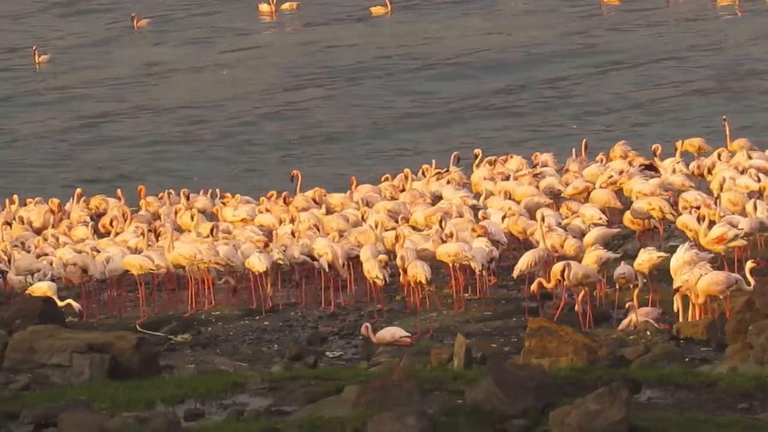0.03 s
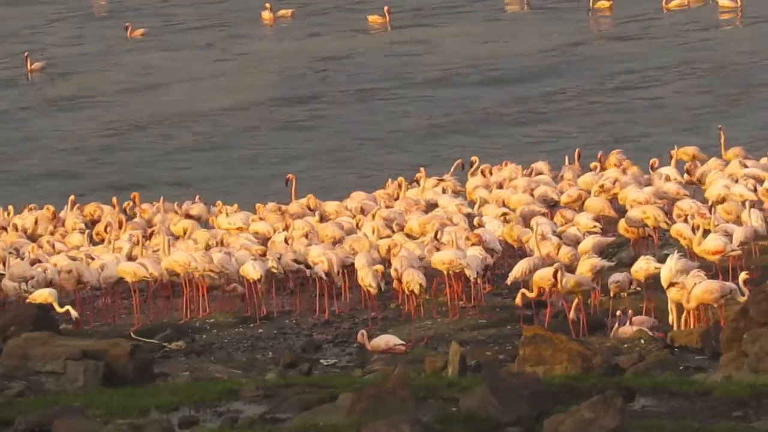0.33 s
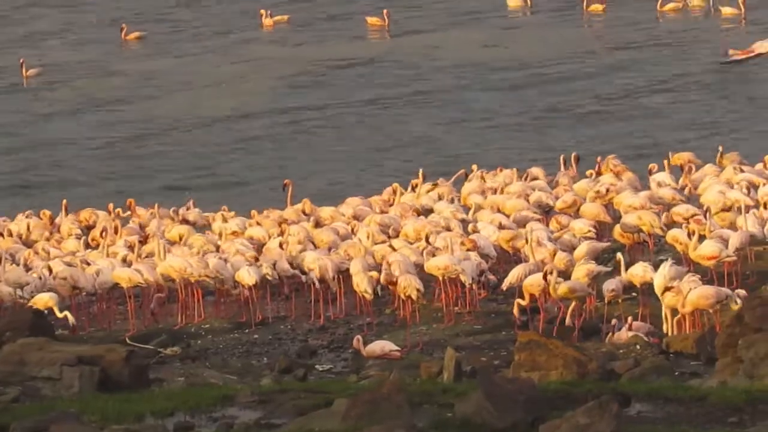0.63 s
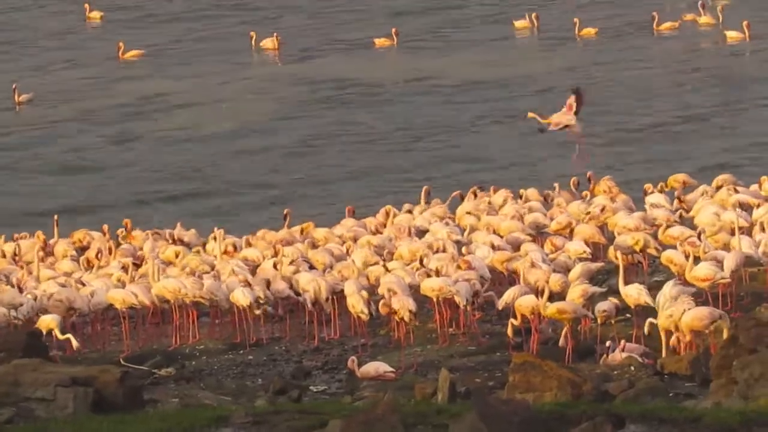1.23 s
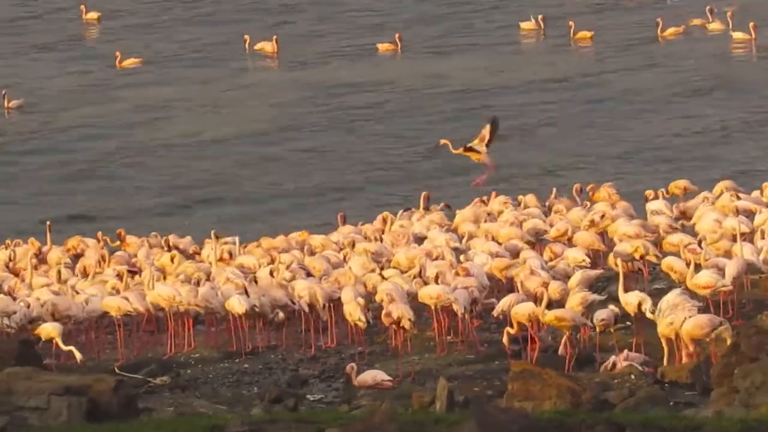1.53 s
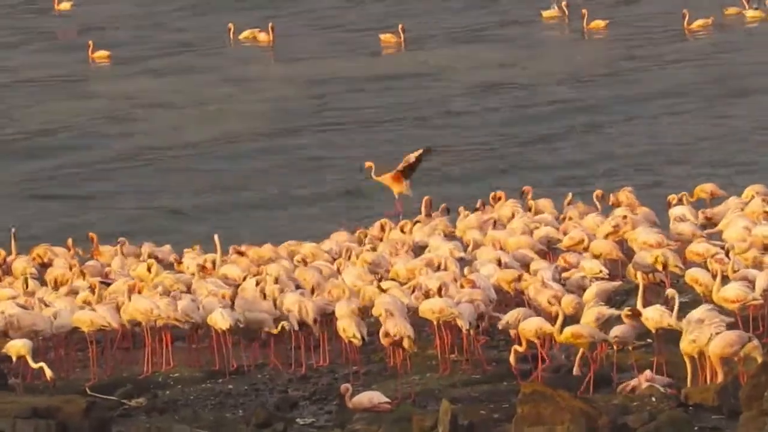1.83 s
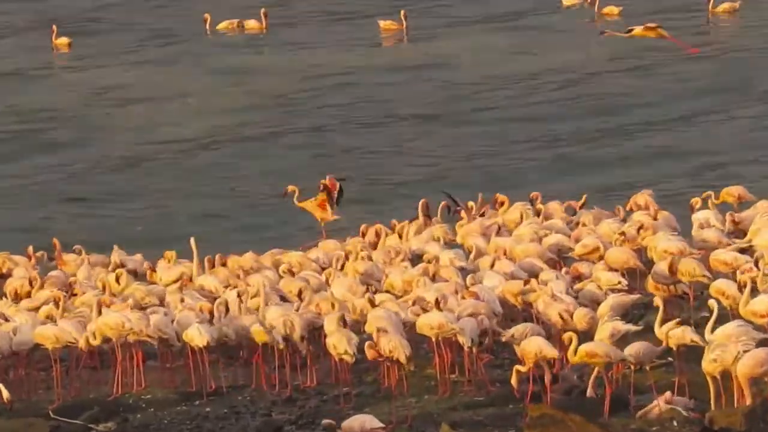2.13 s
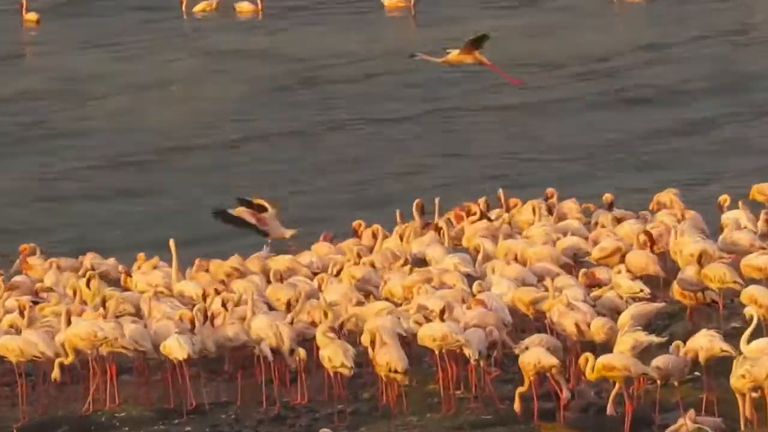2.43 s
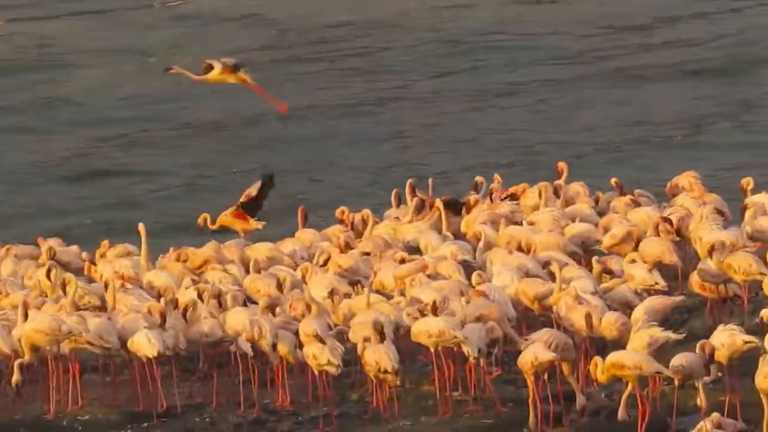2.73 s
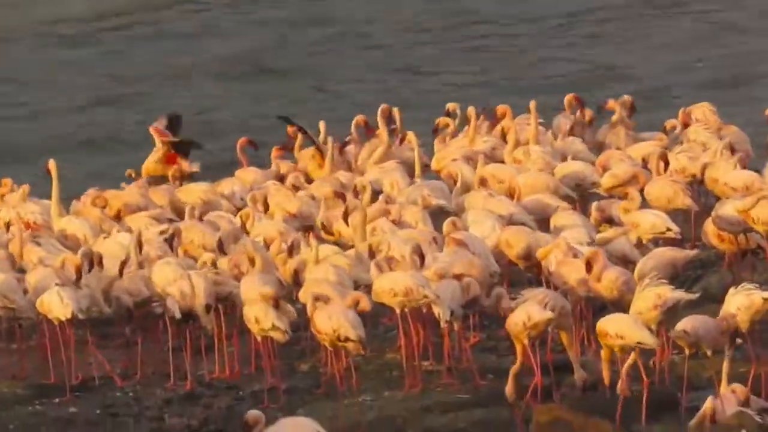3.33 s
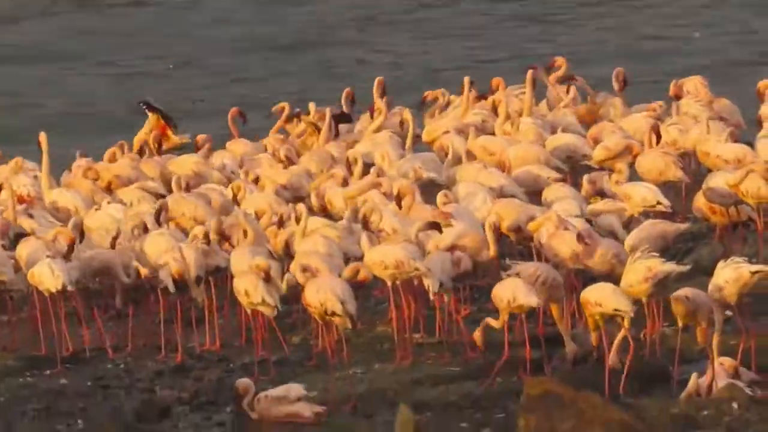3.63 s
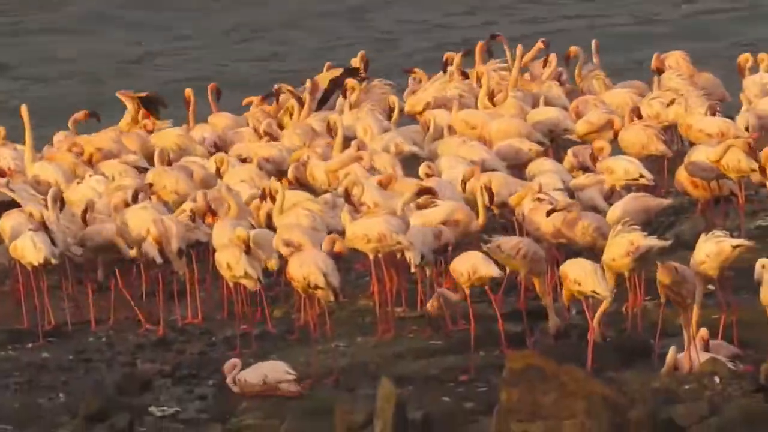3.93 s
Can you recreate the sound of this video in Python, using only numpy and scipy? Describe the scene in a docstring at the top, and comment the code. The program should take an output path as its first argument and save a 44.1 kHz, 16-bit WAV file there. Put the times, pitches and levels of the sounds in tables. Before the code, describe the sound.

Flamingos give nasal honks over the grunting babble of their flock at a lakeshore.

```python
"""A lakeshore with a big flock of flamingos, some way off and a little to the right.
One bird after another gives a nasal, arched honk over low grunts and the babble of the whole flock;
each call is a train of pulses and breath ringing a throat and bill. Farther birds squeak, water washes
behind them with a faint trill and hum, wind bumps the microphone at first, and small knocks sound nearby."""
import sys
import numpy as np
from scipy import signal
from scipy.fft import rfft, irfft, next_fast_len
from scipy.io import wavfile
from scipy.ndimage import uniform_filter1d

SR = 44100
rng = np.random.default_rng(int(sys.argv[2]) if len(sys.argv) > 2 else 0)


def master_out(mix):
    """Clip the mix to full scale and print it as 16-bit PCM to the path in sys.argv[1]."""
    frames = np.transpose(np.atleast_2d(mix))
    ceiling = np.clip(frames, -1, 1)
    pcm = np.round(ceiling * 32767).astype(np.int16)
    wavfile.write(sys.argv[1], SR, pcm)


N = 176400

# Resonances of throat and bill in a grunt. Each row: frequency in Hz, gain in dB.
GRUNT_THROAT = [(150, -36), (400, -13.5), (850, -17), (1200, -6), (1560, 6), (2000, 5), (2500, 2.5),
                (2920, -6.5), (3450, -20.5), (4700, -17), (6200, -13.5), (8300, -14.5), (12000, -25.5),
                (15000, -48)]
HONK_ARCH, GRUNT_ARCH = .16, .1  # how far the pitch sags at the ends of a call


def undb(db):
    """Decibels to gain."""
    return 10 ** (np.asarray(db) / 20)


def unit(x):
    """Scale to rms 1."""
    return x / np.sqrt(np.mean(x ** 2) + 1e-20)


def add(track, x, start_s):
    """Mix a sound into a track."""
    i = int(start_s * SR)
    a, b = max(i, 0), min(i + len(x), N)
    if b > a:
        track[a:b] += x[a - i:b - i]


def curve_db(f, points):
    """Join (Hz, dB) points on a log-frequency axis."""
    hz, db = np.array(points, float).T
    return np.interp(np.log(np.maximum(f, 1)), np.log(hz), db)


def colour(x, points):
    """Minimum-phase EQ through (Hz, dB) points."""
    size = 2 * next_fast_len(len(x) // 2 + 512)
    gain = undb(curve_db(np.arange(size // 2 + 1) * SR / size, points))
    cepstrum = irfft(np.log(gain))
    cepstrum[1:size // 2] *= 2
    cepstrum[size // 2 + 1:] = 0
    return irfft(rfft(x, size) * np.exp(rfft(cepstrum)))[:len(x)]


def noise(eq):
    """Coloured noise at rms 1."""
    return unit(colour(rng.standard_normal(N), eq))


def waver(rate_hz):
    """Smooth random wavering, spread near 1."""
    k = int(SR / rate_hz)
    return uniform_filter1d(np.repeat(rng.standard_normal(N // k + 1), k), k)[:N]


def hum():
    """A faint, low, steady throb."""
    # Sine tones. Each row: frequency in Hz, level in dB.
    tones = [(22.8, -53), (44.5, -59.5)]
    t = np.arange(N) / SR
    return sum(undb(db) * unit(np.sin(2 * np.pi * (hz * t + rng.random()))) for hz, db in tones)


def wash():
    """Small waves and moving air: a wide, gently wavering bed of noise."""
    # Tone of the bed's mid and side channels. Each row: frequency in Hz, gain in dB.
    mid_eq = [(15, -51), (25, 0), (44, -10.5), (60, -6), (130, -10), (280, -5), (400, -6.5), (550, -5),
              (850, -14), (1500, -4), (3300, -20), (4800, -21), (9000, -28), (12000, -31), (15000, -47.5)]
    side_eq = [(15, -23), (30, -1), (90, -10.5), (160, -13), (280, -10), (550, -14), (900, -11.5),
               (2000, -15), (3300, -13.5), (5000, -22.5), (9000, -17.5), (12000, -22.5), (15000, -37)]
    mid = undb(-43 + 2.15 * waver(9.69)) * noise(mid_eq)
    side = undb(-53 + 1.6 * waver(7)) * noise(side_eq)
    fade_db = -0.06 * (np.arange(N) - N / 2) / SR
    return np.array([mid + side, mid - side]) * undb(fade_db)


def low_wash():
    """A dull wash of air and water that swells now and then."""
    # Its muffled tone. Each row: frequency in Hz, gain in dB.
    eq = [(90, -29.5), (170, -4.5), (290, 0.5), (500, -4), (750, -17), (1500, -53.5)]
    # Its swells. Each row: time in seconds, level in dB.
    swells = [(0, -56), (.6, -55.5), (.8, -47.5), (1.1, -67), (1.9, -60), (2.4, -55.5), (2.8, -55),
              (3.45, -51.5), (4, -52)]
    db = np.interp(np.arange(N) / SR, *np.array(swells).T)
    return undb(db + 2.5 * waver(12)) * noise(eq)


def trill():
    """A thin, insect-like whistle that flutters, coming and going."""
    # Bursts of trilling. Each row: start and end in seconds.
    bursts = [(0, 0.091), (.35, 0.7), (.82, 1.1), (2.12, 2.5), (2.55, 3.2), (3.0, 3.15), (3.4, 3.67),
              (3.9, 4.4)]
    t = np.arange(N) / SR
    gate = uniform_filter1d(sum(1. * ((t > start) & (t < end)) for start, end in bursts), size=800)
    return undb(-66.5) * gate * waver(220) * unit(np.sin(2 * np.pi * 9000 * t))


def wind_bumps():
    """Brief low buffets on the microphone, partly different on each side."""
    # Gusts. Each row: middle and length in seconds, level in dB.
    gusts = [(0.111, 0.033, -38), (0.189, 0.059, -44), (0.272, 0.009, -30), (0.306, 0.096, -44.5),
             (0.532, 0.043, -45), (0.83, 0.21, -52.5)]
    # Their rumble. Each row: frequency in Hz, gain in dB.
    eq = [(15, 0), (45, -0.5), (120, 1.5), (220, -12.5), (400, -15), (1500, -90)]
    t = np.arange(N) / SR
    push = sum(undb(db) * np.exp(-2 * ((t - middle) / length) ** 2) for middle, length, db in gusts)
    left, right, centre = (noise(eq) for _ in range(3))
    return push * (centre + np.array([left, right]))


def knocks():
    """Small knocks nearby, each a dry tick and a short hollow ring."""
    # Each row: start in seconds, level in dB, ring pitch in Hz, tick trim in dB.
    hits = [(3.2046, -33, 1960, 6), (3.208, -29.5, 760, -8), (3.314, -32, 630, -5), (3.446, -31, 1150, -18),
            (3.478, -29.5, 1120, -26)]
    # Tone of the tick. Each row: frequency in Hz, gain in dB.
    tick_eq = [(300, -13), (1500, 5.5), (2700, -0.5), (3300, 4), (3800, 4.5), (4400, -14), (8000, -11.5),
               (15000, -22)]
    tick_s, ring_s = .0008, .0025  # decay times
    out, t = np.zeros(N), np.arange(SR // 10) / SR
    for start, db, hz, tick_db in hits:
        tick = colour(rng.standard_normal(len(t)) * np.exp(-t / tick_s), tick_eq)
        ring = np.sin(2 * np.pi * hz * t) * np.exp(-t / ring_s)
        add(out, undb(db) * (ring + 2 * undb(tick_db) * tick / np.abs(tick).max()), start)
    return out


def shore_reflections(x):
    """Short scatter from rocks, water and bodies, different on each side."""
    # Tone of the reflections. Each row: frequency in Hz, gain in dB.
    eq = [(200, -6), (1500, -2.5), (3000, 1), (5000, 6.5), (9000, 6), (15000, -10)]
    t60_s = 0.054
    t = np.arange(SR // 2) / SR
    decay = undb(-60 * t / t60_s)
    tails = [unit(rng.standard_normal(len(t)) * decay) / np.sqrt(len(t)) for _ in range(2)]
    return undb(-5.5) * np.array([signal.fftconvolve(x, colour(tail, eq))[:N] for tail in tails])


def squeaks():
    """Thin, slightly arched whistles from farther birds, made hoarse by a fast pitch waver."""
    # Each row: middle and length in seconds, top pitch in Hz, level in dB.
    calls = [(.385, 0.074, 4350, -56), (.81, 0.043, 4650, -58), (.948, 0.026, 3950, -60),
             (.97, .05, 6100, -57), (1.222, 0.031, 4050, -55), (1.392, 0.015, 3900, -48),
             (1.568, 0.015, 3700, -58), (2.148, 0.022, 3550, -55), (3.245, 0.047, 5450, -59)]
    out = np.zeros(N)
    for middle, length, hz, db in calls:
        u = np.linspace(-2, 2, int(2 * length * SR))
        pitch = hz * np.exp(-.04 * u ** 2 + .045 * waver(900)[:len(u)])
        whistle = unit(np.sin(2 * np.pi * np.cumsum(pitch) / SR))
        add(out, undb(db) * whistle * np.exp(-u ** 2), middle - length)
    return out


def syrinx(u, hz, arch, rough):
    """Pulses and puffs of air on an arched pitch, raspier as it sags; u is time in half call lengths."""
    jitter_s, shimmer_db, odd_pulse_dip, rasp = .00016, 6, .39, 1.5  # at full roughness
    n = len(u)
    jitter, shimmer = rng.standard_normal((2, 256))
    air = rng.standard_normal(SR // 2)[:n]
    rough = np.clip(rough + .1 * u ** 2, 0, 1)
    pitch = hz * np.exp(-arch * np.abs(u + .1) ** 2.4)  # tops out just before the middle
    cycles = np.cumsum(pitch) / SR
    k = np.arange(1, int(cycles[-1]))
    uneven = np.interp(k, cycles, rough)
    at = np.interp(k, cycles, np.arange(n)) + uneven * jitter_s * SR * jitter[k]
    strength = undb(uneven * shimmer_db * shimmer[k]) * (1 - uneven * odd_pulse_dip * (k % 2))
    taps = at.astype(int)[:, None] + np.arange(-5, 7)
    clicks = strength[:, None] * np.sinc(taps - at[:, None])  # placed between samples
    pulses = np.bincount(np.clip(taps, 0, n - 1).ravel(), clicks.ravel(), n)
    puffs = air * np.exp(-(cycles % 1) / .4)
    return unit(pulses) + rough * rasp * unit(puffs)


def call(throat, arch, length, hz, rough, ring_hz, bright_db, edge_hz, edge_db, hiss_hz, hiss_db):
    """The syrinx rings a throat that brightens as the bill opens; swell and fade span twice the length."""
    u = np.linspace(-2, 2, int(2 * length * SR))
    source = syrinx(u, hz, arch, rough)
    f = np.geomspace(100, 16000, 160)
    rings = sum(db * np.exp(-(np.log2(f / centre) / .12) ** 2)  # this bird's own three resonances
                for centre, db in [(ring_hz, 4.5), (edge_hz, 6), (hiss_hz, 4)])
    treble_from_hz = 3500
    tilt = bright_db * np.clip(np.log2(f / 2070), -.5, .5) * (f < treble_from_hz)
    treble = curve_db(f, [(treble_from_hz, 0), (edge_hz, edge_db), (hiss_hz, hiss_db)])
    eq_db = curve_db(f, throat) + rings + tilt + treble
    bill_open = unit(colour(source, np.c_[f, eq_db]))
    bill_shut = unit(colour(source, np.c_[f * .92, eq_db]))
    opening = np.exp(-u ** 2 / 2)
    swell = .5 ** (np.abs(u) ** 3.6)
    return (opening * bill_open + (1 - opening) * bill_shut) * swell


def flock(count=80):
    """Many farther birds grunt over one another, each with its own pitch and throat."""
    out = np.zeros(N)
    for i, (when, pitch, stretch, loud, ring, treble) in enumerate(rng.uniform(-1, 1, (count, 6))):
        length, treble_db = .12 * (1 + .3 * stretch), -11 + 4 * treble
        voice = call(GRUNT_THROAT, GRUNT_ARCH, length, hz=164 * 2 ** (.6 * pitch), rough=.12,
                     ring_hz=1844 * 2 ** (.32 * ring), bright_db=6.5,
                     edge_hz=4000, edge_db=treble_db, hiss_hz=7240, hiss_db=treble_db)
        add(out, undb(1.24 * loud) * voice, (i + when) / count * N / SR - length)
    return undb(-49) * unit(out)


def grunts():
    """The low pulsed calls that stand out from the flock."""
    # Each row: middle and length in seconds, top pitch in Hz, level in dB, roughness from 0 to 1,
    # throat resonance in Hz, brightness in dB per octave, raspy edge in Hz and dB, hiss in Hz and dB.
    calls = [(.135, 0.15, 154.8, -41.5, 0.24, 2000, -7.5, 4270, 5, 7500, -8),
             (.375, .11, 143.7, -42, 0.5, 1570, -1, 4350, -1, 7000, -20),
             (0.437, 0.051, 227.4, -43, 0, 2100, -7, 4400, 3, 7000, -2.5),
             (.785, .08, 171.5, -44, 0.2, 1840, -5, 4650, 3, 6450, -1.5),
             (1.055, .1, 180.9, -40, 0.25, 1610, 2, 4600, 10, 8300, 1.5),
             (1.282, 0.12, 124.3, -42, 0.13, 2400, 14, 4400, 10, 7700, -2),
             (1.376, 0.11, 183.7, -47.5, 0.13, 2350, -3, 4760, 17, 7500, 2),
             (1.464, .03, 314.5, -36, 0.26, 1430, -5, 4400, 14, 6100, -1),
             (1.53, 0.11, 121.8, -41.5, 0.2, 1800, 6.5, 5000, 2, 7000, -8),
             (1.726, 0.11, 165.7, -43, 0.32, 1850, 1, 5100, 2.5, 7700, 1),
             (1.954, 0.12, 145.2, -42.5, 0.44, 1900, -5, 4970, 4, 7000, -11),
             (2.035, .11, 131.4, -42, 0.3, 1890, 10, 4700, 4, 7700, -5.5),
             (2.189, .064, 219.6, -41.5, 0.35, 1670, -2, 4630, 6, 7800, -1),
             (2.266, 0.097, 110.4, -41.5, 0.37, 2040, 3, 4800, 3, 7000, -6),
             (2.33, .078, 140.1, -45, 0.33, 2480, 15, 5100, 8, 7140, 6),
             (2.957, .13, 127, -38.5, 0.33, 1480, 0, 4470, 4.5, 7000, -9),
             (3.121, 0.091, 134.5, -40, 0.5, 2000, -2, 4250, 5, 7800, -7),
             (3.23, 0.092, 150, -45.5, 0.35, 2230, 3, 5400, 1, 7500, -0.5),
             (3.452, .09, 152.8, -48.5, 0.37, 1560, 18, 5100, 4, 8350, 5),
             (3.605, 0.1, 139.5, -42, 0.17, 1500, 1, 5260, 0, 6500, -2),
             (3.775, 0.09, 142.6, -47.5, 0.07, 1510, 10, 5200, 7.5, 8400, 7),
             (3.955, 0.17, 140.9, -42.5, 0.42, 1520, 7, 4500, 2, 6500, -1)]
    out = np.zeros(N)
    for middle, length, hz, db, *voice in calls:
        add(out, undb(db) * call(GRUNT_THROAT, GRUNT_ARCH, length, hz, *voice), middle - length)
    return out


def honks():
    """The loud calls: the two sides of the syrinx sound at different pitches, the second one brighter."""
    # Each row: middle and length in seconds, top pitch in Hz, level in dB, second voice in Hz and
    # relative dB, roughness from 0 to 1, throat resonance in Hz, brightness in dB per octave,
    # raspy edge in Hz and dB, hiss in Hz and dB.
    calls = [(0.65, 0.082, 412, -36, 425.5, -11, 0.3, 1660, -6, 5040, 0.5, 8700, -4),
             (.912, 0.12, 398, -40, 350, -13, 0.14, 1190, -8, 3900, -8, 6200, -2.5),
             (1.188, 0.11, 389.3, -39, 357, -5, 0.2, 1500, -14, 4070, -5, 7000, 3),
             (1.428, 0.095, 387.8, -35.5, 425, -6, 0.35, 2460, -4, 4940, -1, 9000, -1),
             (1.659, 0.11, 386.6, -38.5, 372, -6.5, 0.35, 1460, -4.5, 5000, -5.5, 7500, -1.5),
             (1.871, 0.097, 374, -38.5, 325, -6, 0.52, 2280, 2, 4450, -3, 7800, 0.5),
             (2.105, 0.067, 384, -36.5, 430, -2.5, 0.47, 2380, 1, 4700, -10, 7700, -4),
             (2.487, .11, 356.2, -39, 390, -12, 0.5, 1370, -3.5, 4040, -1.5, 7000, 2.5),
             (2.746, .125, 319.5, -37.5, 290, -9.5, 0.22, 2240, -4, 4830, -1.5, 8050, 3),
             (3.049, 0.15, 329, -39, 300, -13, .1, 2260, -4.5, 4650, -5, 8500, 2),
             (3.349, 0.067, 288.2, -40.5, 330, -5, .29, 1700, -2, 5170, -3.5, 8600, 4),
             (3.406, .07, 389.4, -42, 360, -16, 0.43, 1140, -18, 4500, -6, 7500, -12)]
    # Nasal resonances of throat and bill. Each row: frequency in Hz, gain in dB.
    throat = [(200, -44), (400, -16), (800, -17), (1150, -2), (1550, 1.5), (1900, 2.5), (2400, 4.5),
              (2850, -7), (3400, -18), (4200, -12), (4900, -12.5), (6500, -18), (8500, -20), (12000, -34.5),
              (15000, -63)]
    second_ring_hz, second_bright_db = 2040, 9.5
    out = np.zeros(N)
    for middle, length, hz, db, second_hz, second_db, rough, ring_hz, bright_db, *treble in calls:
        first = call(throat, HONK_ARCH, length, hz, rough, ring_hz, bright_db, *treble)
        second = call(throat, HONK_ARCH, length, second_hz, rough, second_ring_hz, second_bright_db, *treble)
        add(out, undb(db) * (first + undb(second_db) * second), middle - length)
    return out


def scene():
    """Birds to the right with their reflections, over water and wind."""
    # Where the birds sit in the stereo image. Each row: frequency in Hz, left minus right in dB.
    pan = [(300, -8), (1400, -3), (2400, -4.5), (4500, 0.5), (9000, 2.5)]
    birds = honks() + grunts() + squeaks() + flock()
    pan_db = curve_db(np.arange(N // 2 + 1) * SR / N, pan)
    direct = irfft(rfft(birds) * undb(np.array([pan_db, -pan_db]) / 2), N)
    return direct + shore_reflections(birds) + wash() + low_wash() + trill() + hum() + wind_bumps() + knocks()


def record(dry):
    """A steep low-pass takes off the very top."""
    return signal.sosfilt(signal.ellip(10, .2, 80, 15600, fs=SR, output="sos"), dry)


dry = scene()
out = record(dry)
master_out(out)
```